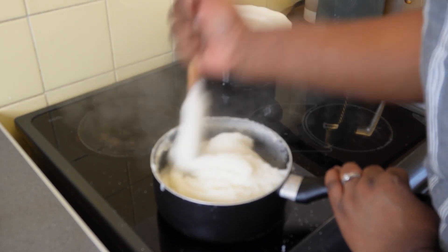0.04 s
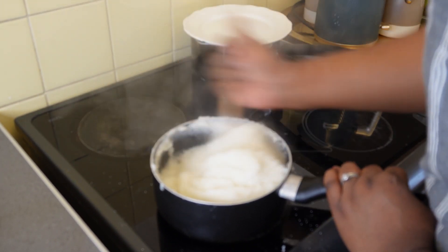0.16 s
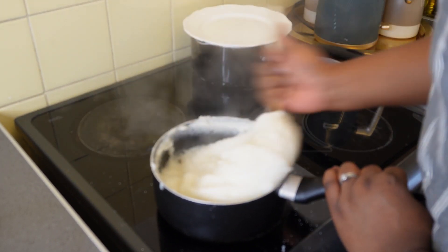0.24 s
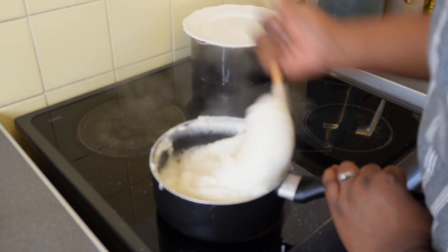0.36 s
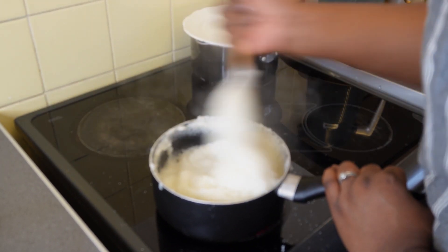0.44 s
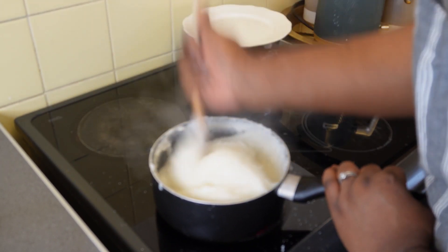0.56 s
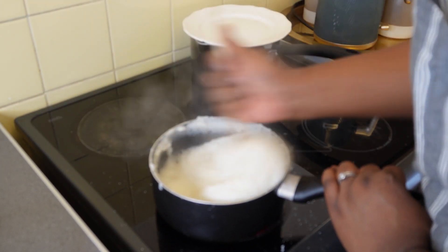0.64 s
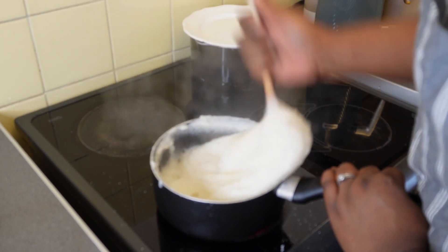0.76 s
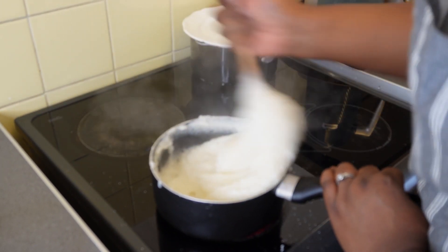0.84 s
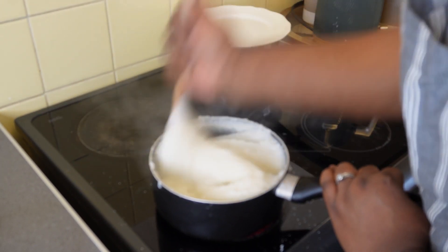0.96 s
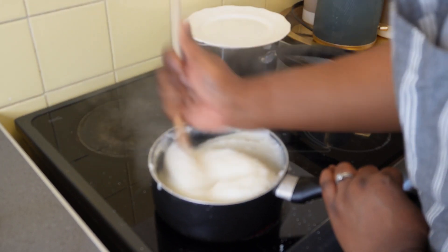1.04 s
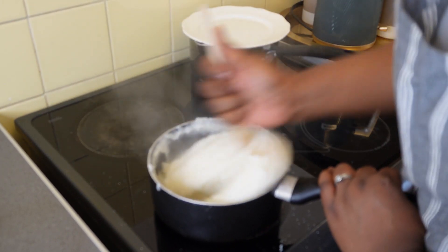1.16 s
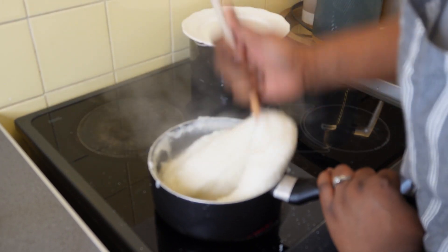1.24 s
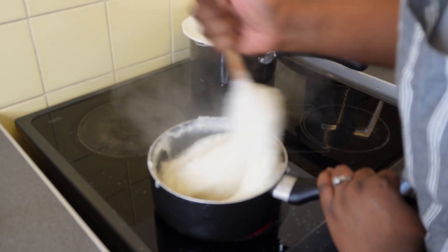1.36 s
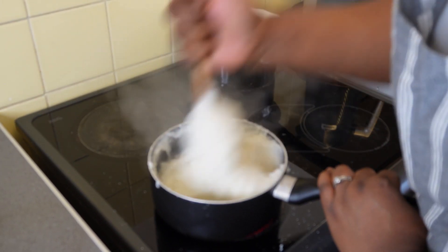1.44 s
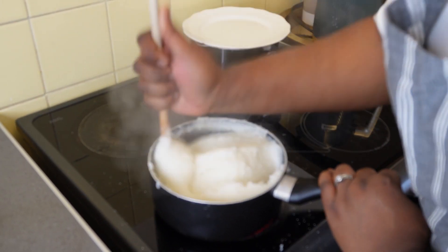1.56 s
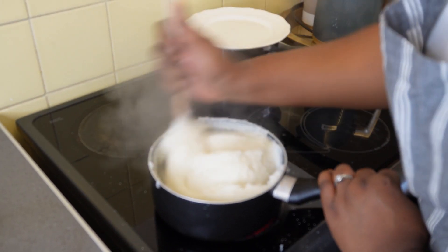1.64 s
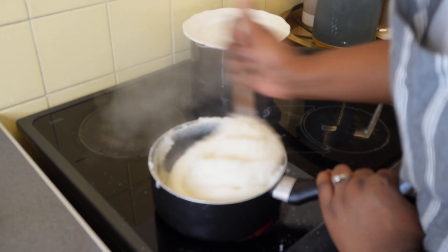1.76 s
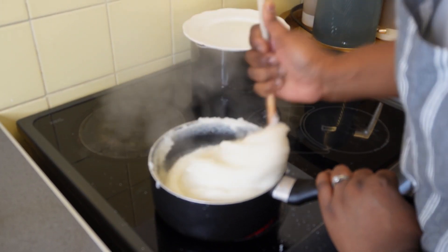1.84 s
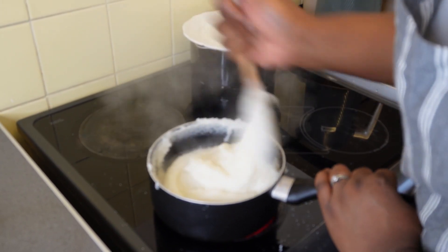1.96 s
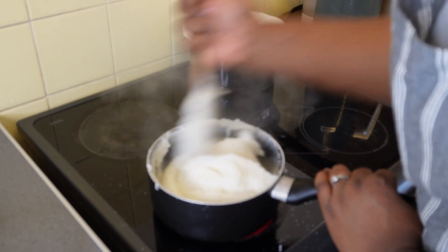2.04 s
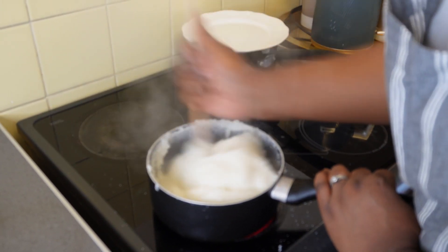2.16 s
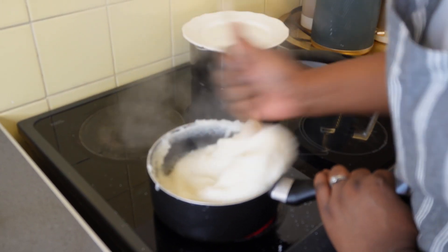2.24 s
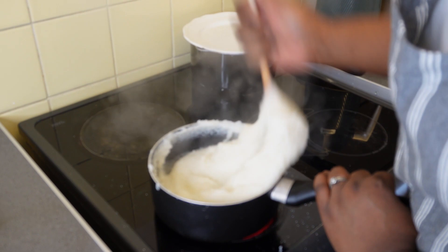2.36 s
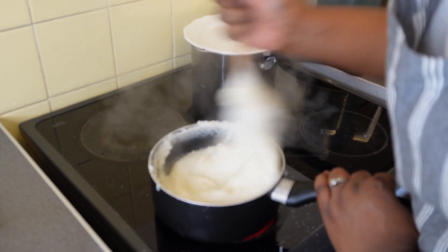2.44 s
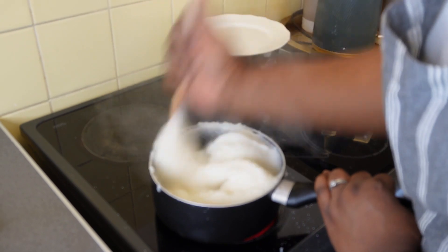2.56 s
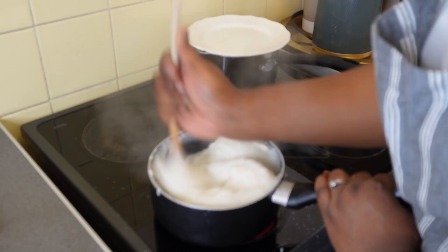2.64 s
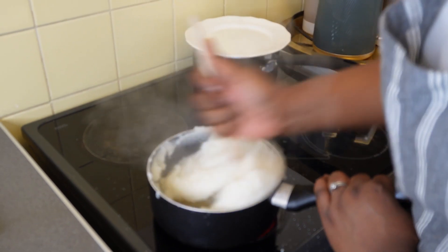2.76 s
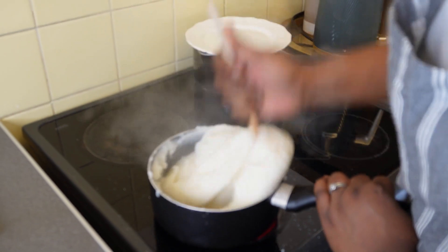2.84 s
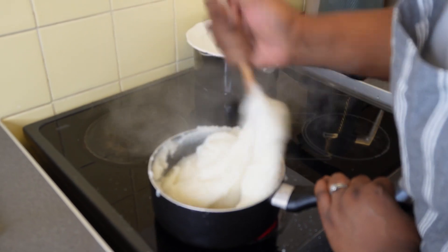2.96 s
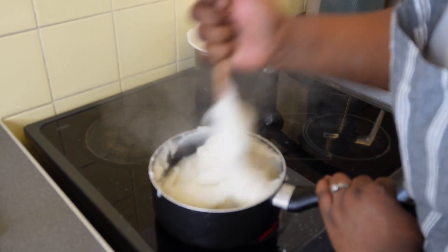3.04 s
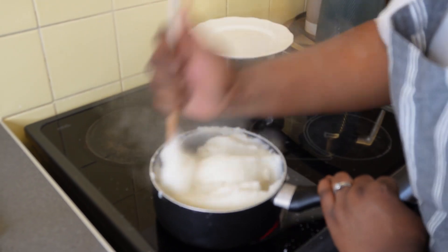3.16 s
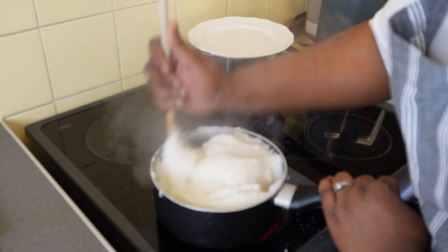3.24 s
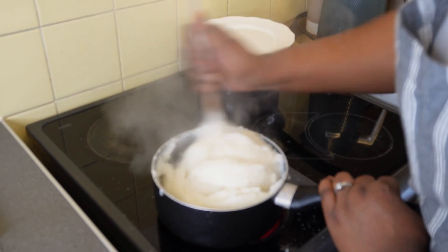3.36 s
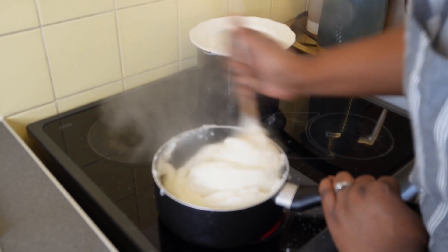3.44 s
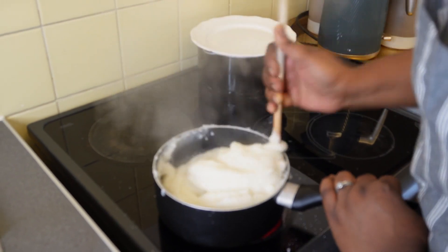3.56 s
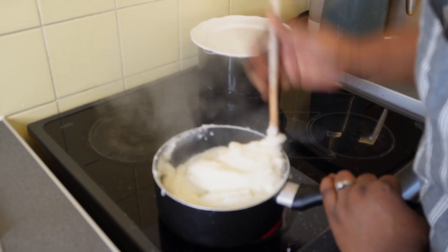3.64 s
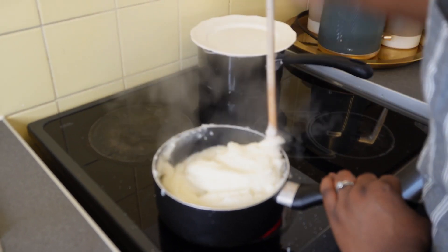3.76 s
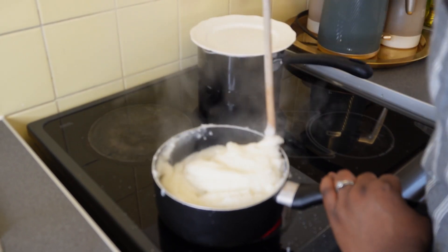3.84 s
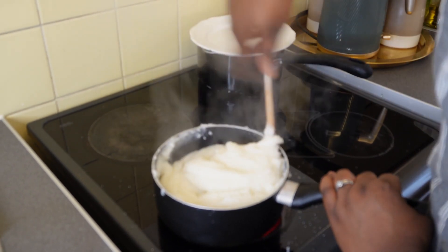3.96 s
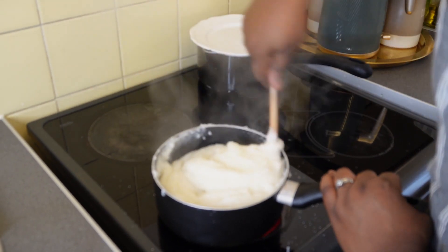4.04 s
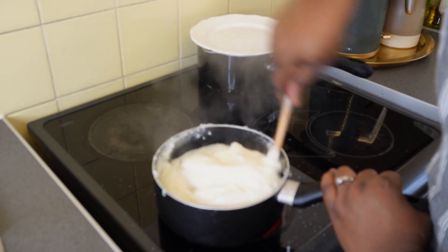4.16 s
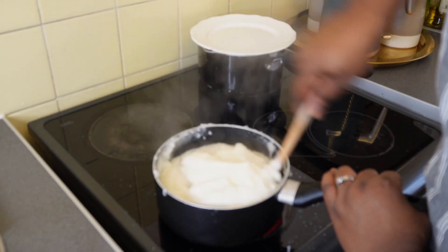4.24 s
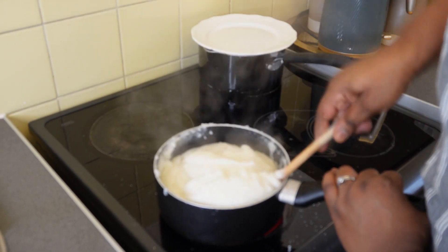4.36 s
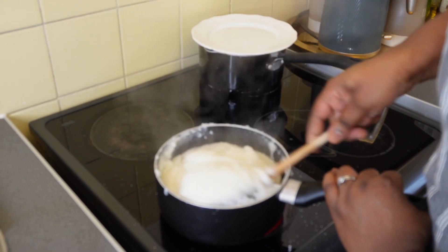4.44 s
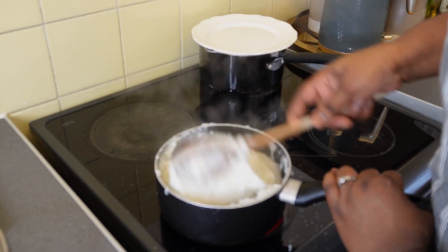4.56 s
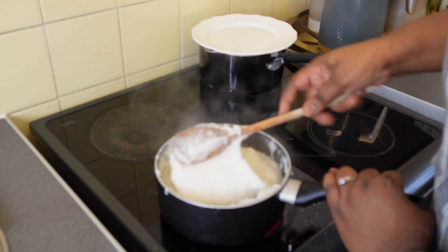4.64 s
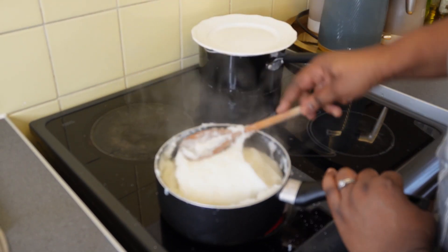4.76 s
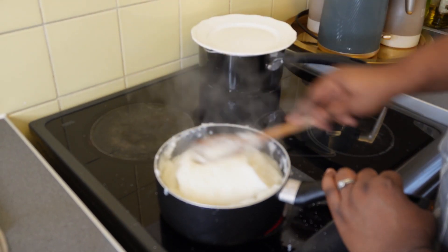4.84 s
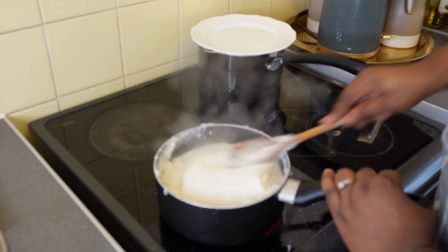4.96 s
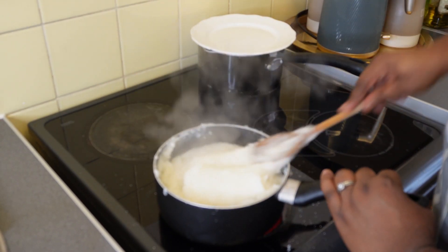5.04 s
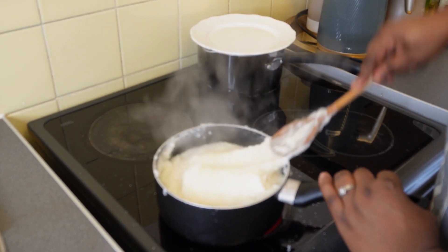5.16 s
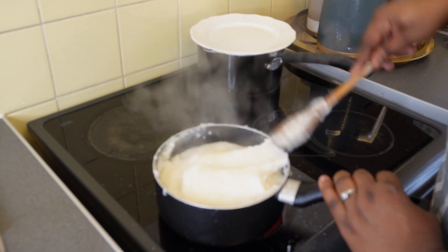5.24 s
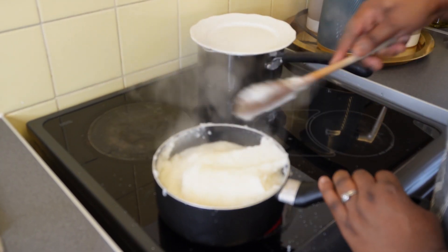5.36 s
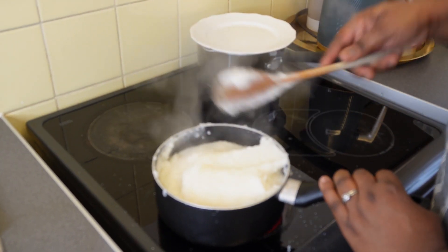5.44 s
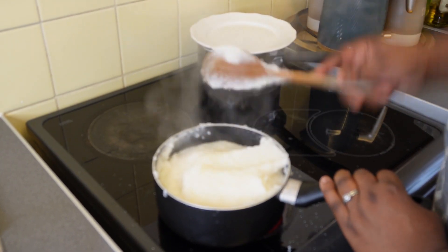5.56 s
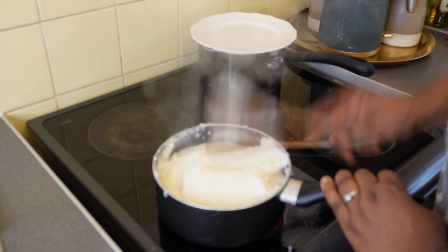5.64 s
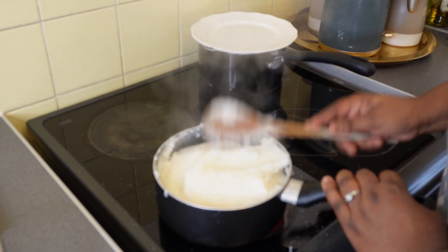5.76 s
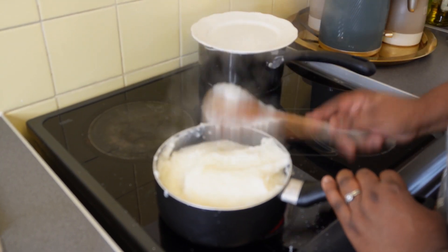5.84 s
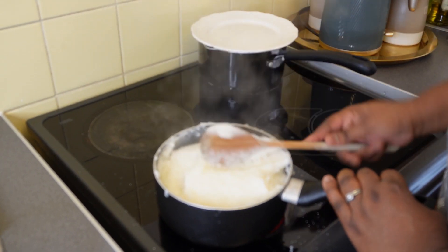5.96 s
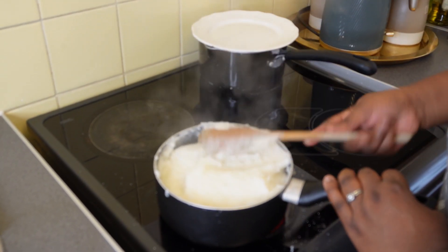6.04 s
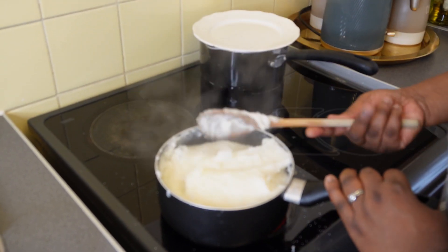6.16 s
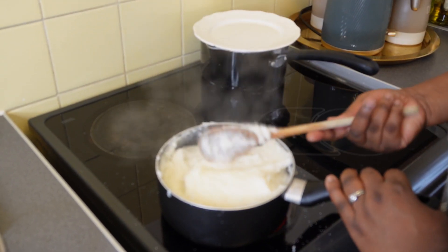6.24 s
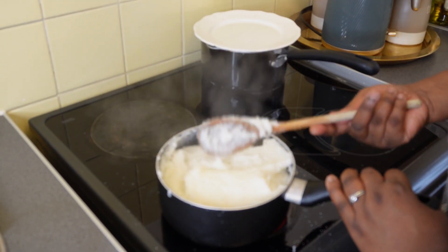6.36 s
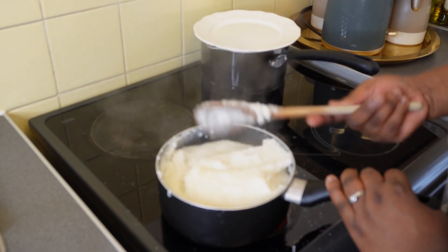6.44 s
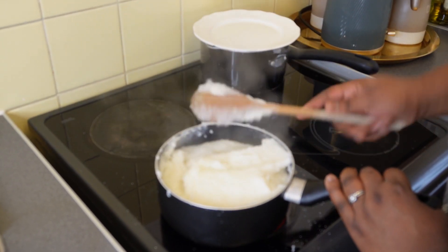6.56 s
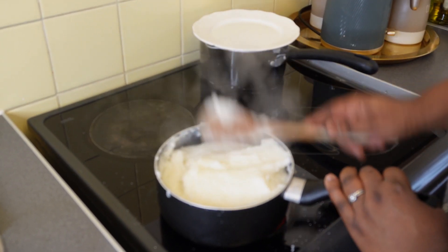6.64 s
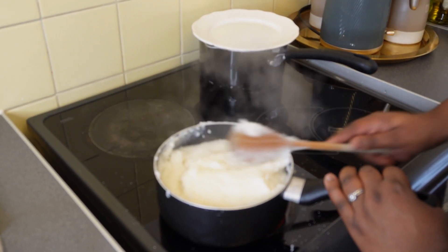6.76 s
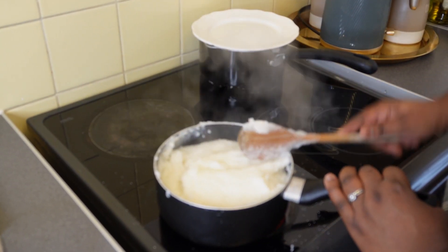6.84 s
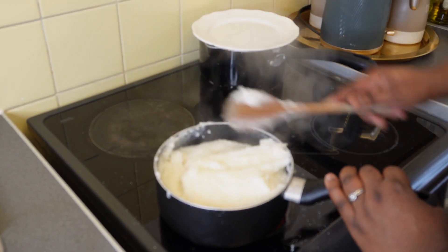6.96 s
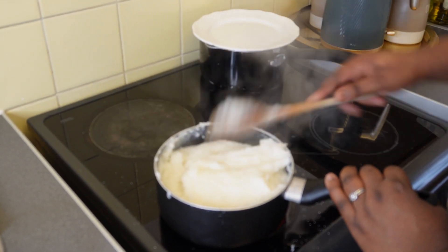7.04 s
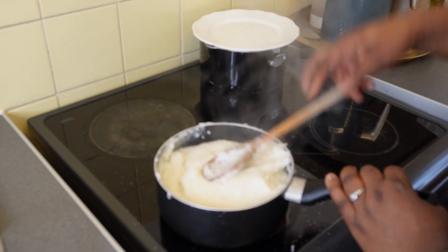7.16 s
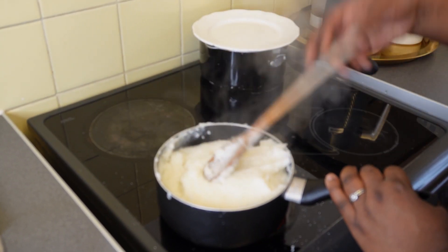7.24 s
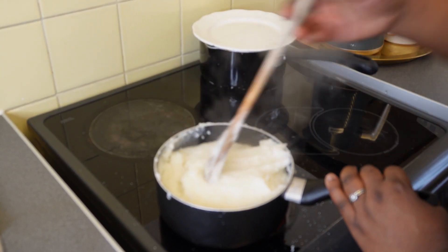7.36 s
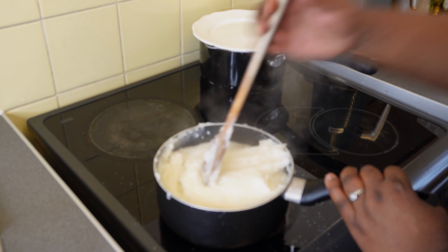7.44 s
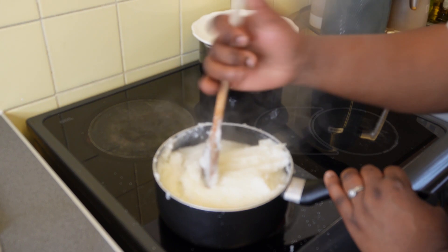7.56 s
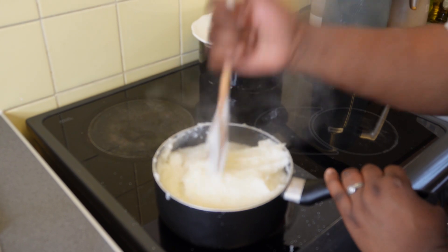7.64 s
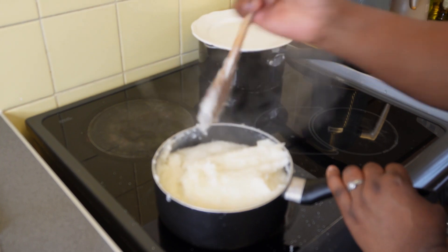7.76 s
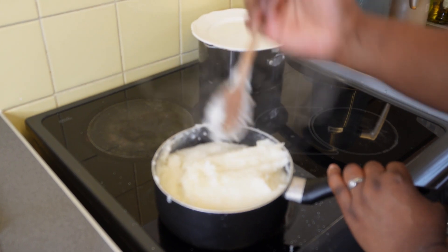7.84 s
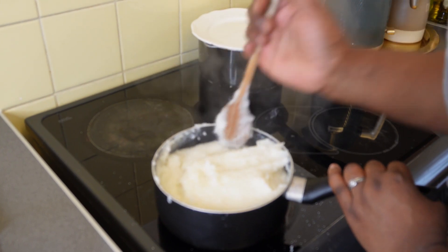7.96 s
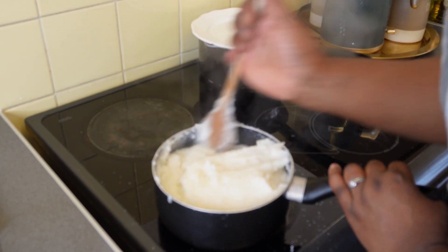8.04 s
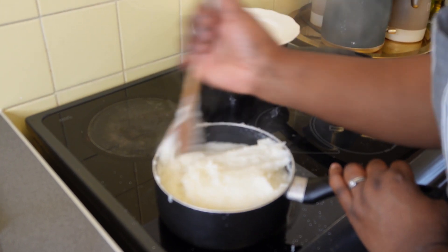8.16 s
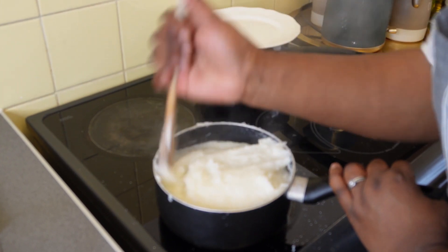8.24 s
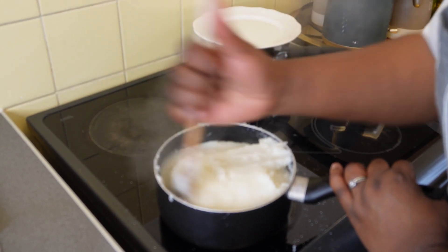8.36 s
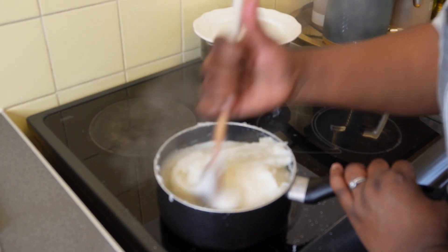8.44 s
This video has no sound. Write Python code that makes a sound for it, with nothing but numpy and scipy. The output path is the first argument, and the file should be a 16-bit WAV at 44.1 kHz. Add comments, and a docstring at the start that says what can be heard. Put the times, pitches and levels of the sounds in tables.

```python
"""In a tiled kitchen, stiff porridge is beaten with a wooden spoon in a small saucepan on a glass hob.
Paste smeared over hot metal hisses and crackles: filtered noise and random grains, shaped by resonances.
Slaps are decaying tones that sink in pitch, squelches are sliding noise bands, snaps are noise ticks.
The spoon is knocked three times on the rim (noise cracks and struck modes), then pushed in again.
A soft simmer with thin steam whistles lies beneath."""
import sys
import numpy as np
from scipy import signal
from scipy.fft import rfft, irfft, next_fast_len
from scipy.io import wavfile

SR = 44100
rng = np.random.default_rng(int(sys.argv[2]) if len(sys.argv) > 2 else 0)


def output_pcm(signal):
    """Save a mono or channel-first signal as 16-bit PCM at the path in sys.argv[1].

    Samples are clipped to [-1, 1] before scaling.
    """
    pcm = np.clip(np.atleast_2d(signal).T, -1, 1) * 32767
    wavfile.write(sys.argv[1], SR, np.round(pcm).astype(np.int16))


N = 374833
TIME = np.arange(N) / SR
CONTROL_TIME = TIME[::64]   # coarse time grid for slow controls

# Levels in the tables are relative: the functions below add trims, filters and echoes.
# Simmering background, spectrum: (frequency [Hz], level [dB])
SIMMER_SPECTRUM = [(15, -47), (25, -15), (70, -3), (92, -4), (149, -4.5), (242, -5), (301, -5.5),
                   (373, -8.5), (641, -11), (818, -10), (1040, -13), (3160, -19.5), (3920, -19.5),
                   (4370, -25), (16000, -42.5)]
# Steam escaping from the resting paste: (time [s], length [s], level [dB], frequency [Hz], width [Hz])
WHISTLES = [(6.279, 0.26, -67, 2550, 280), (6.42, 0.41, -69, 3810, 10)]
# Paste sizzling by itself on the pan bottom: (time [s], hiss level [dB], fine fizz re hiss [dB])
SIZZLE = [(0.0, -59, -4.5), (0.9, -59, -5.5), (3.0, -55, -8.5), (4.0, -61, -9.5), (5.2, -59, -3),
          (5.45, -69.5, -11), (5.9, -61.5, -8), (6.7, -63, -10), (7.2, -56, -12), (8.5, -56, -18)]
# Spoon pressing paste onto hot metal, a spurt of hiss:
# (time [s], hiss level [dB], fade [s], hollow low part re hiss [dB], fine fizz re hiss [dB])
PRESSES = [(-0.015, -50, .08, -6, -7), (0.135, -55.5, 0.029, -12, -13), (0.26, -42.5, .07, -3.5, -7.5),
           (0.355, -51, .08, -1, -13), (0.6, -59, .04, -8, -14), (0.805, -51, .05, -5, -7),
           (1.04, -51.5, .07, -9, -5.5), (1.128, -42, 0.07, -4.5, -14), (1.215, -46, 0.075, 0, -16),
           (1.68, -41, 0.091, -4.5, -6.5), (1.85, -43, .025, -4, -6.5), (1.928, -46, 0.089, -13, -3),
           (2.02, -45, 0.053, -8, -5.5), (2.16, -43, 0.078, -22, -6), (2.3, -48, 0.028, -3.5, -8.5),
           (2.718, -47, 0.052, 1, -2), (2.8, -36.5, 0.041, -5, -9.5), (2.98, -49.5, 0.088, -4, -9.5),
           (3.305, -38, 0.065, -8, -6), (3.44, -43, .08, -2.5, -15), (3.71, -54, .04, -10, -0.5),
           (7.18, -51, 0.038, -8, -23.5), (7.365, -48, 0.053, -14.5, -17), (7.715, -46.5, .05, -11.5, -11),
           (8.32, -31.5, .055, -21, -9.5)]
# Spoon dragged through the paste, opening a hollow behind it: (time [s], length [s], hiss level [dB],
# hollow low part re hiss [dB], fine fizz re hiss [dB], low resonance [Hz], high resonance [Hz],
# high resonance re hiss [dB])
DRAGS = [(1.27, 0.13, -50, -0.5, -17, 686, 2700, 7), (1.421, 0.29, -47, -8, -11.5, 999, 2303, -1.5),
         (2.11, 0.17, -44.5, -22, -15, 999, 2926, -1), (2.256, 0.2, -49, -0.5, -14, 1030, 2800, -4),
         (2.493, 0.11, -49, -12, -18, 952, 3100, -1), (3.049, 0.18, -47, -9, -10.5, 957, 2150, -1),
         (3.218, 0.27, -42, -12, -22, 749.5, 2100, -3.5), (3.521, 0.08, -50, -1, -5, 946, 1657, -1),
         (4.147, 0.13, -51, -3, -6.5, 852.5, 2800, -6), (4.293, 0.094, -54, -2, -9.5, 659, 2400, 2),
         (4.489, 0.12, -53, -2, -11, 750, 2306, -3.5), (4.602, 0.083, -39.5, -9, -14, 1056, 2150, 0.5),
         (4.719, 0.23, -42, -8.5, -12, 1380, 1820, -8.5), (4.95, 0.18, -50.5, -4, -8.5, 650, 1700, -8),
         (7.107, 0.35, -51.5, -7.5, -24, 1250, 2395, -10), (7.529, 0.23, -48, -14.5, -16, 1200, 1704, -11),
         (8.09, 0.18, -47, -15.5, -12.5, 1103, 2352, -16), (8.336, 0.08, -43.5, -5, -16, 1000, 2300, -3)]
# Steam and bursting pores, spectrum: (frequency [Hz], level [dB])
HISS_SPECTRUM = [(240, -40), (400, 0.5), (598, 5), (676, 1.5), (921, -1.5), (1010, 4.5), (1140, -4),
                 (1330, 3), (1790, -6), (2020, -4), (2250, -2.5), (4510, -5), (15000, -25), (16000, -24)]
# Resonances of the air in the pan: (frequency [Hz], width [Hz], level [dB])
POT_AIR = [(1813, 61, 4.5), (2350, 170, -14), (2980, 44, -22), (3390, 17, -34), (3720, 90, -11),
           (5620, 58, -15), (6000, 49, -12), (6430, 86, -10)]
# Paste slapping down and shutting in a pocket of air:
# (time [s], pocket level [dB], pocket frequency before its sag [Hz], settling mass level [dB], settling time [s])
SLAPS = [(0.213, -43.5, 195, -54, 0.047), (0.285, -29, 161, -49, .08), (0.298, -36.5, 91, -52, 0.089),
         (0.369, -34, 435, -41, 0.027), (0.496, -26.5, 425, -46, 0.04), (0.735, -39.5, 293.5, -49, .065),
         (0.816, -35.5, 397, -44.5, .054), (1.092, -27, 430, -38, 0.13), (1.224, -38.5, 257, -40.5, 0.041),
         (1.268, -32.5, 564, -58, .04), (1.659, -24, 320, -32.5, 0.064), (1.784, -33.5, 195, -45.5, .14),
         (2.244, -39, 400, -42, 0.078), (2.441, -35.5, 507, -54, .05), (2.688, -21, 541, -37.5, .055),
         (2.795, -40, 338, -40, 0.094), (3.29, -24, 506, -38.5, .1), (3.45, -36, 209, -44, 0.097),
         (4.957, -33.5, 265, -42, .11), (4.965, -35.5, 111, -56, 0.053), (5.055, -34, 333, -46, .14),
         (8.068, -40, 308.6, -44.5, .041)]
# Settling lump of paste, spectrum: (frequency [Hz], level [dB])
MASS_SPECTRUM = [(24, -42), (40, -11), (70, -6.5), (110, -11.5), (167, 2.5), (329, -8), (499, -9),
                 (869, -16.5), (1040, -41), (1100, -19), (1430, -36), (2420, -120)]
# Steam squeezed through a gap in the paste:
# (time [s], length [s], level [dB], first frequency [Hz], last frequency [Hz])
SQUELCHES = [(0.260, 0.065, -39, 1836, 1402), (0.271, 0.055, -41.5, 7350, 3600),
             (2.797, 0.066, -39.5, 5400, 4670), (2.806, 0.064, -59, 3200, 2847),
             (3.214, 0.068, -39, 2660, 3200), (3.348, 0.054, -35.5, 3706, 3020),
             (3.43, 0.0575, -42, 3450, 3190), (7.375, 0.028, -40, 2510, 2720),
             (8.334, 0.048, -35.5, 5400, 5200), (8.333, 0.063, -38.5, 2694, 2190)]
# Thick sticky strands snapping: (time [s], peak level [dB], centre frequency [Hz])
SNAPS = [(0.263, -25, 1700), (0.369, -28.5, 900), (0.424, -22, 5300), (0.871, -28.5, 4230),
         (1.111, -24, 5500), (1.145, -25.5, 2960), (1.657, -22.5, 3520), (1.709, -22.5, 6020),
         (1.776, -24, 6000), (1.878, -25, 3940), (1.986, -28, 9150), (2.067, -23, 5000), (2.267, -18, 5100),
         (2.408, -25, 6010), (2.69, -19.5, 3820), (3.292, -24, 3500), (4.098, -29.5, 7980),
         (7.374, -25.5, 7020)]
# Spoon knocked on the rim: (time [s], ring level [dB], hardness as top frequency [Hz],
# thud of pan on hob [dB], wet tick level [dB], tick ahead by [s], after-ring level [dB])
KNOCKS = [(5.746, -16, 9400, -21, -19.5, 0.0041, -3), (5.964, -12.5, 8800, -19, -20.5, 0.002, -2.5),
          (6.7611, -15.5, 1410, -25, -32.5, 0, -11)]
# Wood on the rim, spectrum: (frequency [Hz], level [dB])
RIM_SPECTRUM = [(120, -6), (200, -1), (299, -14.5), (328, -13), (366, -12), (519, -9.5), (735, -10),
                (806, -10.5), (1230, -7.5), (2020, -11), (3560, -11), (4680, -16.5), (6760, -29),
                (16000, -67)]
# Modes of the pan: (frequency [Hz], level [dB], 60 dB decay time [s])
PAN_MODES = [(657, -12, .45), (745, -10, .3), (1066, -4, .27), (1206, -5, .27), (1281, -4, .3),
             (1357, -4, .27), (1399, -2, .3), (1529, -7, .24), (1922, -9, .3), (2277, -6, .22),
             (2533, -5, .27), (2751, -3, .27), (2830, -3, .28), (3106, -7, .24), (3532, -3, .27),
             (3779, -8, .3), (4541, -5, .28)]
# Modes of pan and glass hob flexing together: (frequency [Hz], level [dB], 60 dB decay time [s])
HOB_MODES = [(73, -8, .6), (102, -7, .4), (127, -7, .35), (160, -2, .48), (186, -7, .28), (204, -8, .42),
             (240, -7, .48), (296, -7, .27), (365, -12, .36)]
# Reverberation of the kitchen: (frequency [Hz], 60 dB decay time [s])
KITCHEN_DECAY = [(60, 1), (200, 0.64), (500, 0.41), (1500, 0.39), (5000, 0.41), (15000, 0.35)]
# Difference between the two microphones: (frequency [Hz], side re mid [dB])
SPREAD = [(100, -30.5), (300, -23), (1000, -18), (2500, -18), (5000, -10), (9000, -6.5), (15000, -7)]
# Sideways position of the pan: (frequency [Hz], left re right [dB])
LEAN = [(250, 0), (600, -0.5), (1200, 0.8), (2500, -0.3), (4500, 2.6), (8000, -0.2), (13000, 0)]

SIZZLE_HOLLOW_DB = -9   # re its hiss
PRESS_ATTACK_S = .025
PRESS_LOW_HZ, PRESS_HIGH_HZ = 1012.5, 3224   # the small hollow of a press
PRESS_FOCUS_DB = -10   # high resonance re hiss
DRAG_ATTACK_S, DRAG_RELEASE_S = .07, .06
HOLLOW_SAG_OCT_PER_S = .4   # the hollow widens along a stroke and its pitch sinks
CAVITY_WIDTH_HZ = 810
PORES_PER_S, PORE_SPREAD_DB = 1500, 3.6
THREADS_PER_S, THREAD_FADE_S, THREAD_DB = 75, 0.0046, -16.5   # level re the press gain
CRACK_DB, PAN_DB = 1, -11
CUTOFF_HZ = 15900


def from_db(db):
    """Definition of level: decibels to amplitude gain."""
    return 10 ** (np.asarray(db) / 20)


def rms_one(x):
    """Normalisation: scale to unit power."""
    return x / np.sqrt(np.mean(x ** 2) + 1e-20)


def at_hz(points, hz):
    """Logarithmic frequency scale: read a table along it."""
    points = np.array(points)
    return np.interp(np.log(hz + 1e-9), np.log(points[:, 0]), points[:, 1])


def colour(x, spectrum):
    """Linear filtering: multiply the Fourier spectrum by a (frequency [Hz], gain [dB]) table."""
    size = next_fast_len(x.shape[-1])
    hz = np.arange(size // 2 + 1) * SR / size
    return irfft(rfft(x, size) * from_db(at_hz(spectrum, hz)), size)[..., :x.shape[-1]]


def cut(x, hz, kind, order=2):
    """Butterworth filtering: a maximally flat passband."""
    sos = signal.butter(order, np.clip(hz, 10, .45 * SR), kind, fs=SR, output="sos")
    return signal.sosfilt(sos, x + 1e-18)


def stereo(mid, side):
    """Spatial coherence: two close microphones agree in the bass, less so in the treble."""
    return mid + colour(side, SPREAD) * [[1], [-1]]


def noise(size):
    """Random pressure: white noise as both microphones hear it."""
    return stereo(*rng.standard_normal((2, size)))


def add(out, s, sound):
    """Superposition: mix a sound in at a time."""
    start = max(round(s * SR), 0)
    out[..., start:start + sound.shape[-1]] += sound[..., :N - start]


def blend(first, second, second_db):
    """Power addition of uncorrelated sounds: mix two at constant power."""
    return (first + from_db(second_db) * second) / np.hypot(1, from_db(second_db))


def resonance(hz, width_hz):
    """Cavity resonance: turbulence rings in a band whose centre follows hz; unit power."""
    sway = cut(noise(len(hz)) + 1j * noise(len(hz)), width_hz / 2, "low")
    carrier = np.exp(2j * np.pi * np.cumsum(hz) / SR)
    return rms_one(np.real(sway * carrier))


def dying_noise():
    """Diffuse reverberation: a second of dense echoes, each octave fading at the kitchen's rate."""
    white, out = noise(SR), 0
    hz = np.arange(SR // 2 + 1) + 1e-9
    for centre in 2. ** np.arange(5, 15):
        share = np.maximum(1 - np.abs(np.log2(hz / centre)), 0)   # overlapping octave bands
        fade = from_db(-60 * TIME[:SR] / at_hz(KITCHEN_DECAY, centre))
        out = out + irfft(rfft(white) * share, SR) * fade
    return out


def kitchen(x, wet_db, first_echo_s=0.0053):
    """Room response by convolution: direct sound and echoes off tiles and worktop, scaled to keep power."""
    echoes = dying_noise() * np.clip(TIME[:SR] / first_echo_s - 1, 0, 1)
    echoes *= from_db(wet_db) / np.sqrt(np.sum(echoes ** 2) / 2)
    reverberant = signal.fftconvolve(np.atleast_2d(x), echoes, axes=-1)[:, :N]
    return (x + reverberant) / np.hypot(1, from_db(wet_db))


def background(simmer_db=-57, wide_db=14.5):
    """Diffuse field and narrow-band jets: a wide soft simmer with thin whistles of steam."""
    mid, side = rng.standard_normal((2, N))
    simmer = colour(stereo(mid, from_db(wide_db) * side), SIMMER_SPECTRUM)
    out = from_db(simmer_db) * rms_one(simmer)
    for s, length, db, hz, width_hz in WHISTLES:
        swell = np.sin(np.pi * np.linspace(0, 1, int(length * SR)) ** 2)   # slow rise, faster fall
        add(out, s, from_db(db) * swell * resonance(np.full(len(swell), hz), width_hz))
    return out


def presses():
    """Forced boiling: a spurt per press, as (gain, hollow dB, fizz dB, low Hz, high Hz, focus dB, middle s)."""
    for s, db, fade_s, hollow, fizz in PRESSES:
        age = np.maximum(CONTROL_TIME - s, 0)
        fade = np.exp(-np.maximum(age - PRESS_ATTACK_S, 0) / fade_s)
        gain = from_db(db) * np.minimum(age / PRESS_ATTACK_S, 1) * fade
        yield gain, hollow, fizz, PRESS_LOW_HZ, PRESS_HIGH_HZ, PRESS_FOCUS_DB, s + fade_s


def drags():
    """Sliding friction: a longer stroke per drag, in the same form as a press."""
    for s, length, db, hollow, fizz, low_hz, high_hz, focus in DRAGS:
        age = np.maximum(CONTROL_TIME - s, 0)
        release = np.exp(-np.maximum(age - length, 0) / DRAG_RELEASE_S)
        gain = from_db(db) * np.minimum(age / DRAG_ATTACK_S, 1) * release
        yield gain, hollow, fizz, low_hz, high_hz, focus, s + length / 2


def stirring(sizzle_low_hz=950, sizzle_high_hz=2300, sizzle_focus_db=-12):
    """Power addition: strokes and sizzle sum in power, and the strongest weighs most on the hollow's pitch."""
    s, *columns = np.transpose(SIZZLE)
    sizzle, sizzle_fizz = [np.interp(CONTROL_TIME, s, column) for column in columns]
    resting = (from_db(sizzle), SIZZLE_HOLLOW_DB, sizzle_fizz,
               sizzle_low_hz, sizzle_high_hz, sizzle_focus_db, CONTROL_TIME)
    rows = [np.broadcast_arrays(*row) for row in [resting, *presses(), *drags()]]
    gain, hollow, fizz, low, high, focus, middle = np.stack(rows, axis=1)
    sag = 2 ** (-HOLLOW_SAG_OCT_PER_S * np.clip(CONTROL_TIME - middle, -1, 1))
    hiss_power = gain ** 2
    hollow_power = (gain * from_db(hollow)) ** 2
    fizz_power = (gain * from_db(fizz)) ** 2
    controls = [np.sqrt(power.sum(axis=0)) for power in (hiss_power, hollow_power, fizz_power)]
    controls += [np.average(low * sag, axis=0, weights=hollow_power),
                 np.average(high * sag, axis=0, weights=hiss_power),
                 np.average(focus, axis=0, weights=hiss_power)]
    return [np.interp(TIME, CONTROL_TIME, control) for control in controls]


def grains(per_s, spread_db):
    """Poisson impulses: tiny clicks of random size and sign at random moments; unit power."""
    sizes = from_db(spread_db * np.minimum(rng.exponential(1, N), 5))
    return rms_one(sizes * rng.choice([-1, 1], N) * (rng.random(N) < per_s / SR))


def threads():
    """Random rupture: thin threads part in faint wet ticks, as loud as the press that stretches them."""
    pressure = np.interp(TIME, CONTROL_TIME, sum(row[0] for row in presses()))
    moments = (rng.random(N) < THREADS_PER_S / SR) + 1e-18
    partings = signal.lfilter([1], [1, -np.exp(-1 / (THREAD_FADE_S * SR))], moments)
    ticks = rms_one(cut(noise(N) * partings, [2200, 7000], "band", order=1))
    return from_db(THREAD_DB) * pressure * ticks


def pot_air(x, air_db=-2.5):
    """Air-column resonance: the open pan adds its own resonances to whatever sounds inside it."""
    rings = 0
    for hz, width_hz, db in POT_AIR:
        rings = rings + from_db(db) * signal.lfilter(*signal.iirpeak(hz, hz / width_hz, fs=SR), x)
    return x + from_db(air_db) * rings


def smear(hiss_db=-0.56, hollow_db=-.5, fizz_db=1.0, crackle_db=-3.0, flutter_db=1.06, low_width_hz=230):
    """Turbulence and bursting pores: paste slides on hot metal and sounds through the hollow behind the spoon."""
    level, hollow, fizz, low_hz, high_hz, focus_db = stirring()
    pores = stereo(grains(PORES_PER_S, PORE_SPREAD_DB), grains(PORES_PER_S, PORE_SPREAD_DB))
    source = colour(noise(N) + from_db(crackle_db) * pores, HISS_SPECTRUM)
    # the paste sticks and lets go: a slow random flutter in dB
    slip = flutter_db * rms_one(cut(rng.standard_normal(N), 30, "low"))
    hiss_band = rms_one(cut(source, [1650, 6700], "band", order=4))
    hiss = blend(hiss_band, resonance(high_hz, CAVITY_WIDTH_HZ), focus_db)
    rub_band = rms_one(cut(source, [500, 1250], "band", order=3))
    rub = blend(resonance(low_hz, low_width_hz), rub_band, 0)   # equal shares
    fine = rms_one(cut(source, 7600, "high", order=4))
    parts = from_db(hiss_db) * level * hiss
    parts += from_db(hollow_db) * hollow * rub
    parts += from_db(fizz_db) * fizz * fine
    return kitchen(pot_air(parts + threads()) * from_db(slip), wet_db=-6, first_echo_s=0.00086)


def slaps(pocket_db=1.0, cycles=2.36, sag=0.33, rise_s=0.00077):
    """Damped oscillation: an air pocket rings a few cycles, sinking in pitch, as the lump flops and settles."""
    pockets, mass, t = np.zeros(N), np.zeros((2, N)), TIME[:SR // 2]
    for s, db, hz, settle_db, settle_s in SLAPS:
        # the pitch falls from (1 + sag) to (1 - sag) times hz
        turns = np.cumsum(hz * (1 + sag * (2 * np.exp(-t * hz / 2) - 1))) / SR
        envelope = np.exp(-turns / cycles) * (1 - np.exp(-3 * turns))
        add(pockets, s, from_db(db + pocket_db) * np.sin(2 * np.pi * turns) * envelope)
        lump = rms_one(colour(noise(len(t)), MASS_SPECTRUM))
        settling = (1 - np.exp(-t / rise_s)) * np.exp(-(t / settle_s) ** 2)
        add(mass, s, from_db(settle_db) * lump * settling)
    return kitchen(pockets, wet_db=-9.0) + kitchen(mass, wet_db=-6.5)


def squelches(width_hz=700, squelch_db=0.5, opening_share=0.1):
    """Jet noise: a short spurt through a gap, its pitch sliding as the gap opens."""
    out = np.zeros((2, N))
    for s, length, db, first_hz, last_hz in SQUELCHES:
        along = np.linspace(0, 1, int(length * SR))
        jet = resonance(first_hz * (last_hz / first_hz) ** along, width_hz)
        envelope = np.minimum(along / opening_share, 1) * np.sqrt(1 - along)
        add(out, s, from_db(db + squelch_db) * jet * envelope)
    return kitchen(out, wet_db=-8.0)


def snaps(snap_db=-3.0, fade_s=0.0072, crack_s=0.00055, crack_db=-0.5):
    """Sudden release of tension: each strand parts with a tiny crack and a wet tick."""
    out, t = np.zeros((2, N)), TIME[:SR // 20]
    for s, db, hz in SNAPS:
        shape = np.exp(-t / fade_s) + from_db(crack_db) * np.exp(-t / crack_s)
        tick = cut(noise(len(t)) * shape, [hz * 0.6, hz * 1.15], "band", order=1)
        add(out, s, from_db(db + snap_db) * tick / np.abs(tick).max())
    return kitchen(out, wet_db=-6.5)


def ring(modes):
    """Modal superposition: one second of struck modes, each level varied at random by about 1 dB."""
    t, out = TIME[:SR], 0
    for k, (hz, db, t60) in enumerate(modes):
        fade = from_db(db + rng.normal(0, 1) - 60 * t / t60)
        out = out + (-1) ** k * fade * np.sin(2 * np.pi * hz * t)   # signs alternate
    return out


def knocks(crack_s=0.0068, build_s=0.0035, shove_db=9.0, shove_hz=170, shove_at_s=0.0074, shove_s=0.0048,
           wall_s=.015, tick_s=0.0042, tick_top_hz=8000):
    """Impact excitation: wood cracks on the rim, pan and room ring, and just after the pan shoves the hob."""
    out, ticks, t = np.zeros((2, N)), np.zeros((2, N)), TIME[:SR]
    for s, db, top_hz, thud_db, tick_db, ahead_s, after_db in KNOCKS:
        crack = rms_one(colour(noise(SR), RIM_SPECTRUM)) * np.exp(-t / crack_s)
        echoes = colour(dying_noise(), RIM_SPECTRUM)
        build_and_fade = (1 - np.exp(-(t / build_s) ** 2)) * (1 - t ** 2) ** 2
        echoes *= build_and_fade / np.std(echoes[:, :SR // 50])
        after_ring = echoes + from_db(PAN_DB) * ring(PAN_MODES)
        blow = from_db(CRACK_DB) * crack + from_db(after_db) * after_ring
        add(out, s, from_db(db) * cut(cut(blow, 120, "high"), top_hz, "low"))
        # a bright echo off the tiles
        add(out, s + wall_s, from_db(db) * cut(cut(crack, 2100, "high"), top_hz, "low"))
        tick = cut(noise(SR) * np.exp(-t / tick_s), [2500, tick_top_hz], "band", order=1)
        add(ticks, s - ahead_s, from_db(tick_db) * tick)
        swing = t - shove_at_s   # the hob dips once and springs back
        shove = from_db(shove_db) * np.sin(2 * np.pi * shove_hz * swing) * np.exp(-(swing / shove_s) ** 2)
        flexing = ring(HOB_MODES) * (1 - np.exp(-t / shove_at_s))
        add(out, s, from_db(thud_db) * (shove + flexing))
    return out + kitchen(ticks, wet_db=-2.0)


def scene():
    """Interaural level difference: all sources summed, with the pan a little to the left."""
    left, right = background() + smear() + slaps() + squelches() + snaps() + knocks()
    left_lean = [(hz, db / 2) for hz, db in LEAN]
    right_lean = [(hz, -db / 2) for hz, db in LEAN]
    return np.array([colour(left, left_lean), colour(right, right_lean)])


def record(dry):
    """Band limiting: the microphone drops the deep bass; an elliptic filter cuts the top steeply."""
    without_bass = cut(dry, 38, "high", order=3)
    return signal.sosfilt(signal.ellip(10, .1, 80, CUTOFF_HZ, fs=SR, output="sos"), without_bass)


dry = scene()
out = record(dry)
output_pcm(out)
```